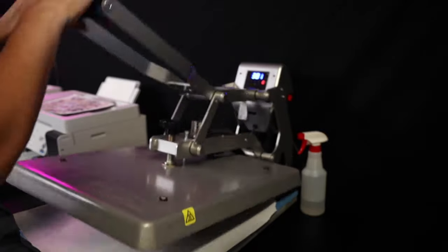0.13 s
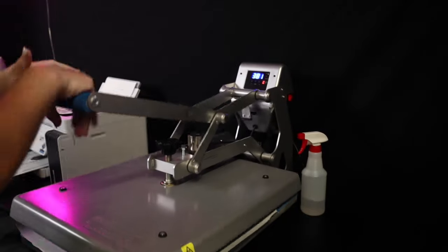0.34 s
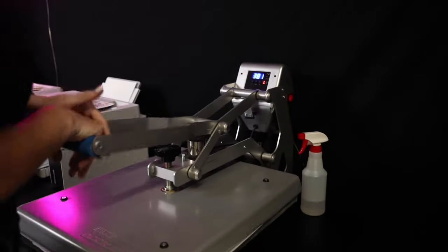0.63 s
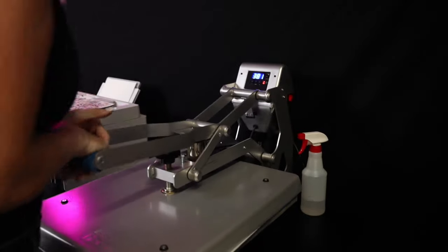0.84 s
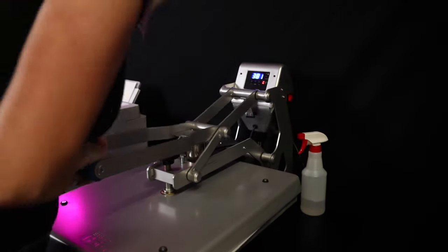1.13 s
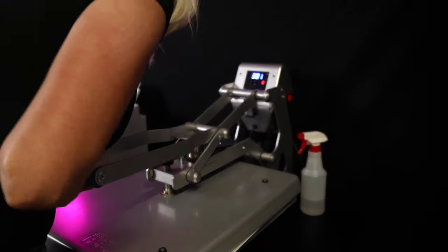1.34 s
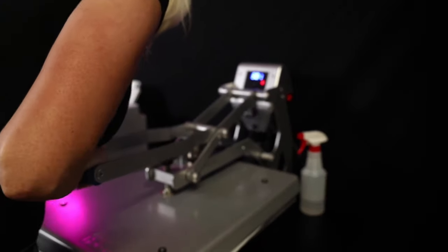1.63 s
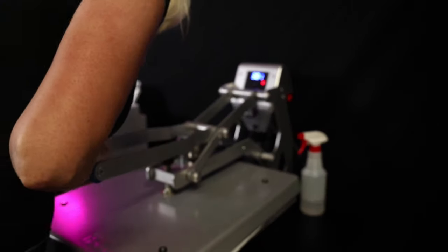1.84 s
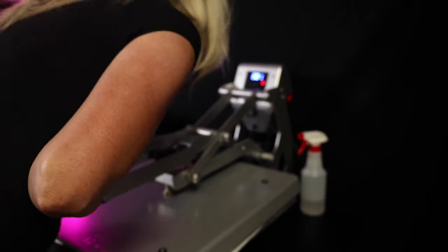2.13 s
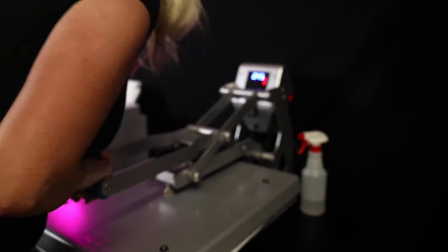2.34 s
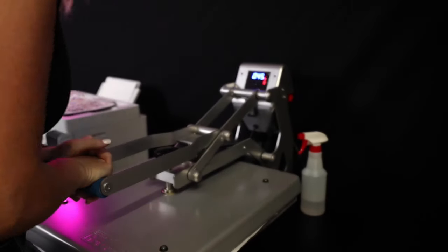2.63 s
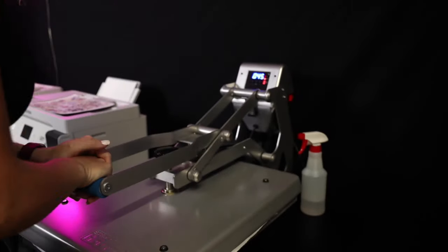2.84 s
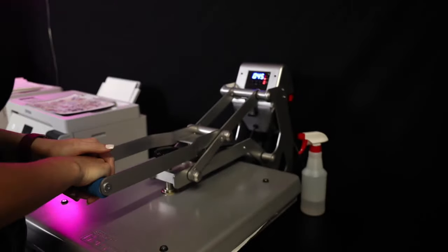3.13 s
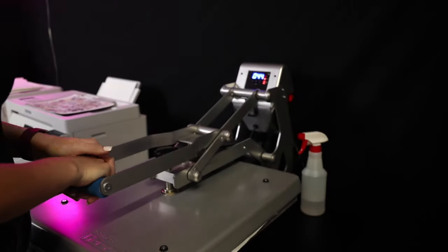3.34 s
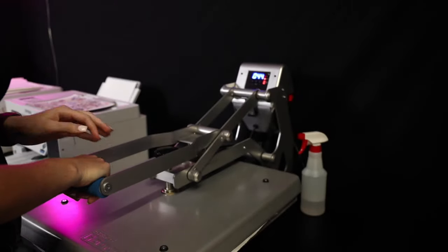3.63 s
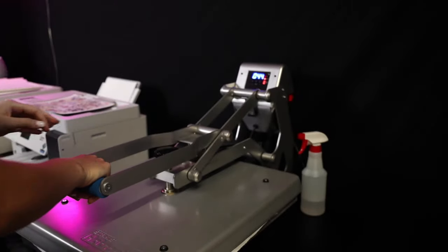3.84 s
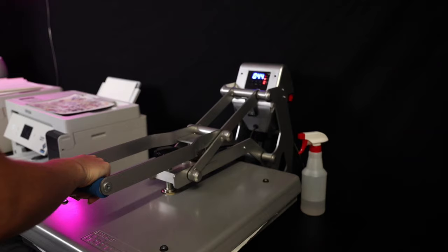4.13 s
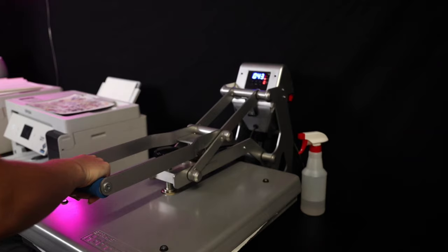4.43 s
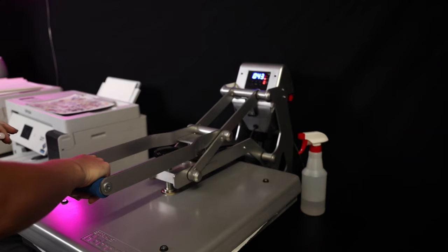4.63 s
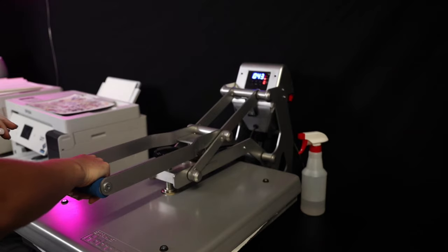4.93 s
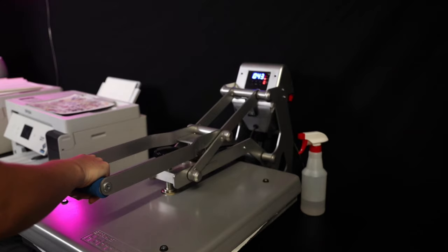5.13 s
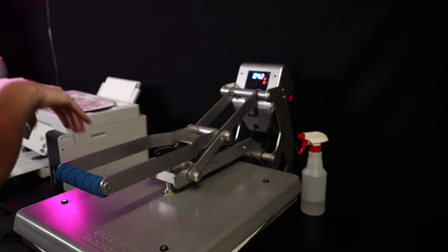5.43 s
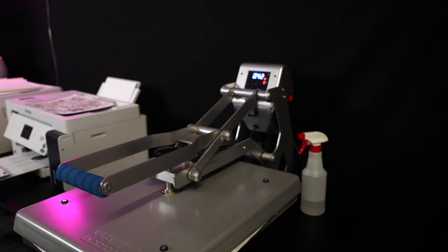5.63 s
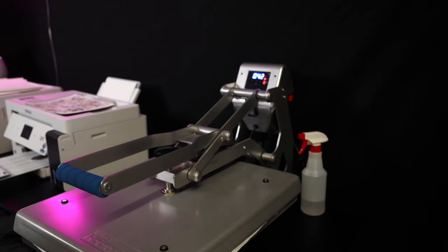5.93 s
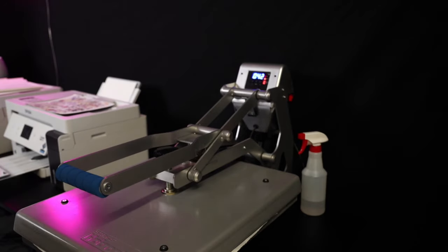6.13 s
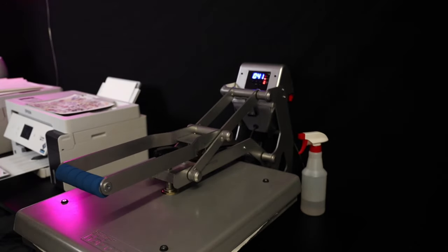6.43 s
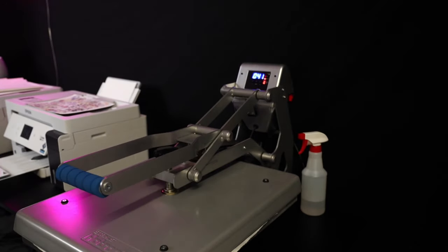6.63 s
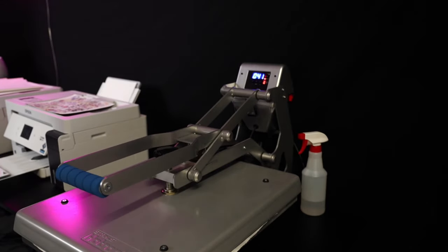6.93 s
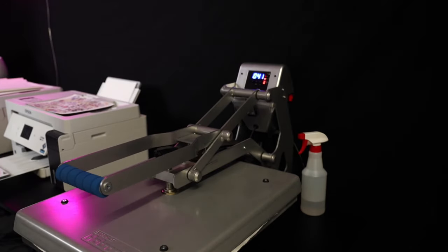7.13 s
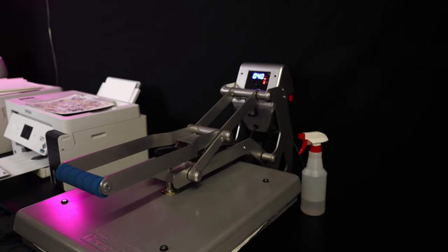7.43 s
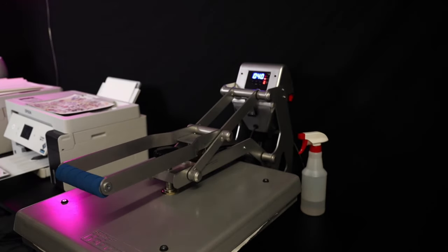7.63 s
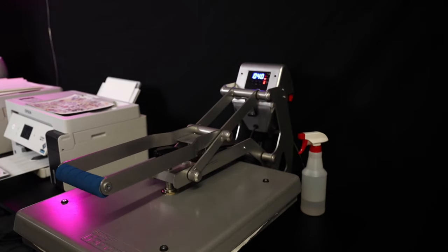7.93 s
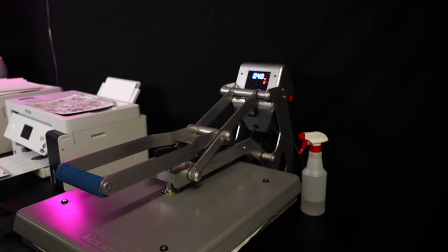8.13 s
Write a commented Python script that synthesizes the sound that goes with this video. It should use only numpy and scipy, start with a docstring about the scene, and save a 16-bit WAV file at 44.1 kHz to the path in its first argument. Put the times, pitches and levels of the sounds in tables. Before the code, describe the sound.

A heavy heat press is pulled shut near the microphone: a short creak, dry ringing metal squeals with a groaning spring, a soft padded thud. Sparse clicks and a faint cloth rustle lead to a sharp, rattling double metal clunk. Afterwards only low hum, soft hiss and barely audible ticks remain, ending with deep stand knocks, tiny squeaks and rustling cloth.

```python
"""Heard first: a hinge creaking close by in a small quiet room, over air noise and the hum of a nearby machine.
A steel handle pulls down the upper plate of a heat press: the linkage scrapes and a spring groans, the plate
lands on the pad, joints tick, and the toggle snaps over with a double clunk. Cloth rustles now and then; at the
end the swaying microphone stand is bumped and squeaks. Chains of tiny random slips drive the resonances of the
metal parts, noise is coloured into cloth, pad and air, and sines make the hum, groan, sway and table boom."""
import sys
import numpy as np
from scipy import signal
from scipy.fft import rfft, irfft, next_fast_len
from scipy.io import wavfile
from scipy.ndimage import uniform_filter1d

SR = 44100
rng = np.random.default_rng(int(sys.argv[2]) if len(sys.argv) > 2 else 0)


def persist_wave(psi):
    """Save psi, clipped to +-1, as 16-bit WAV."""
    counts = np.round(np.clip(psi, -1, 1) * 32767).astype(np.int16)
    wavfile.write(sys.argv[1], SR, np.atleast_2d(counts).T)


N = 366030

# Spectrum of the room rumble and microphone hiss: (frequency [Hz], relative density [dB per Hz])
AIR_COLOUR = [(5, -21), (18, -6), (30, -6), (45, -7), (90, -11), (150, -15), (200, -18.5), (290, -21),
              (420, -27.5), (590, -28), (780, -29), (1070, -35.5), (1220, -32), (1900, -41.5), (11900, -51)]
# Steady tones of the nearby machine: (frequency [Hz], level [dB rms])
HUM_TONES = [(120, -75.5), (220.7, -68), (258.4, -74.5), (780.6, -92), (1179, -100)]
# Its one wavering tone: (frequency [Hz], width of each resonance [Hz], level [dB rms])
WAVERING_TONE = (114, 14, -73.5)
# Jolts through the floor that swell the sway of the stand: (middle [s], level [dB], half length [s])
FLOOR_JOLTS = [(.25, -51, .06), (.76, -55.5, 0.057), (1.04, -45.5, 0.075), (2.35, -65, 0.14),
               (3.9, -58.5, .1), (4.14, -52, .04)]
# Knocks on the microphone stand: (time [s], level [dB])
STAND_KNOCKS = [(7.898, -18), (7.938, -11.5), (8.006, -13), (8.163, -19), (8.207, -28.5), (8.251, -29)]
# Modes of the stand: (frequency [Hz], relative level [dB], t60 [s])
STAND_MODES = [(14, -11, 0.46), (21.9, -10.5, 1), (54, -26.5, 0.38), (115.5, -34.5, 0.73)]
# First slips of the hinge: (time [s], relative level [dB], hold [s])
HINGE_SLIPS = [(0, -55, 0.0037), (0.007, -52, 0.0081), (0.016, -65, 0.018), (0.053, -51.5, 0.0091),
               (0.066, -70, 0.015)]
# Resonances of the hinge: (frequency [Hz], width [Hz], relative level [dB])
HINGE_MODES = [(2120, 120, -8), (2320, 35, -11), (2605, 70, -3.5), (3380, 46, -6), (3660, 100, -6.5),
               (4600, 41, -21), (6120, 100, -19)]
# Strokes of the sliding linkage: (start [s], length [s], level [dB], sag over the stroke [dB],
# low modes re level [dB], high modes re level [dB])
SLIDE_STROKES = [(0.381, 0.26, -48.5, 1, -5, -7), (0.664, 0.022, -51.5, 0, -2.5, -2),
                 (0.758, 0.011, -66, -6.5, -17, 13), (0.774, 0.1, -48, 6.5, -4, -5.5)]
# Resonances of the linkage: (frequency [Hz], width [Hz], relative level [dB])
LINKAGE_MODES = [(1576, 15, -10), (1860, 18, -5.5), (1913, 32, -5.5), (2103, 14, -4.5), (2316, 15, -11.5),
                 (2704, 35, -4), (2910, 16, -10.5), (3082, 36, -2.5), (3430, 110, -15), (3780, 59, 7),
                 (4100, 16, -42), (4270, 32, 0.5), (4670, 22, -6.5), (5220, 38, -13), (6100, 27, -12),
                 (6235, 110, -8.5), (6520, 41, -8.5), (6750, 26, -22), (7435, 28, -50)]
# Its faint high overtones: (frequency [Hz], width of each resonance [Hz], level re stroke [dB])
LINKAGE_OVERTONES = [(8600, 310, -38), (10400, 940, -42)]
# Spectrum of the broad scrape: (frequency [Hz], relative density [dB per Hz])
SCRAPE_COLOUR = [(530, -31), (900, 16), (1160, -44), (1390, -10), (1940, 1), (2180, -6.5), (3800, 5),
                 (4950, -6), (6330, -37.5), (11500, -89.5), (15000, -93), (22000, -120)]
# Pulls in which the counter-spring groans: (start [s], length [s], level [dB], sag over the pull [dB],
# jerk at the start re level [dB])
HANDLE_PULLS = [(.388, .33, -63.5, 13, -18), (0.785, 0.14, -71, 0.5, 16.5)]
# Partials of the groan: (multiple of the slip rate, relative level [dB])
GROAN_PARTIALS = [(1, -12.5), (2, -9.5), (3, 0), (4, -2), (5, 5), (6, 3), (7, -12.5), (8, 4), (9, 0),
                  (10, 6.5), (11, 2.5)]
# Contacts of the plate with the pad: (time [s], mean level [dB])
PLATE_CONTACTS = [(.886, -41), (.892, -37.5), (.899, -33.5), (.906, -41.5), (.928, -50), (.945, -68)]
# Modes of the plate: (frequency [Hz], relative level [dB], t60 [s])
PLATE_MODES = [(428, -20, 0.37), (558, -6.5, 0.058), (638, -7.5, 0.056), (840, -4, 0.032),
               (1420, -14, 0.03), (2160, -13.5, 0.028), (2960, -12, 0.026), (4140, -17, 0.035),
               (4930, -15, 0.028)]
# Booms of the table under the plate and the toggle: (time [s], level [dB])
TABLE_BOOMS = [(0.885, -54.5), (2.235, -62)]
# Spectra of the squeezed pad and of the cloth: (frequency [Hz], relative density [dB per Hz])
PAD_SPECTRUM = [(88, -27), (150, 5), (226, -25), (283, -50), (378, 3), (1440, -9.5), (3890, -13),
                (9000, -42), (11700, -70), (19800, -120)]
CLOTH_SPECTRUM = [(180, -28), (300, -5), (561, -3), (773, -7.5), (1180, -6), (11500, -28.5), (15000, -58),
                  (22000, -120)]
# Cloth moving: (middle [s], level [dB], half length [s])
CLOTH_MOVES = [(1.3, -79.5, 0.19), (5.3, -85, 0.082), (5.9, -86.5, 0.23), (7.55, -75.5, .07),
               (7.89, -75, 0.087), (8.2, -73, 0.14)]
# Joints ticking: (time [s], level [dB], pitch [Hz], broad part re modes [dB], hold [s])
JOINT_TICKS = [(0.934, -61, 1150, -12, 0.0091), (0.97, -85, 2500, -11, 0.014), (0.976, -66, 2420, 0, 0.02),
               (0.998, -65, 1145, -17, 0.0099), (1.142, -72, 1166, -9, 0.0047),
               (1.174, -76.5, 1100, -31, 0.037), (1.202, -75, 1390, -5, 0.012),
               (1.28, -76, 4940, -4.5, 0.013), (1.344, -77.5, 3080, 9, 0.011),
               (1.379, -63.5, 2820, -4, 0.014), (1.556, -74.5, 1130, -1.5, 0.0076),
               (1.589, -68.5, 1850, -21, 0.022), (2.198, -78.5, 4200, 0, 0.01),
               (2.442, -59.5, 1140, -5, 0.011), (2.506, -64.5, 1570, -24.5, 0.011),
               (2.592, -79, 1300, -9, 0.021), (2.744, -76.5, 1253, -4, 0.012), (5.332, -90, 4500, 1, .014),
               (5.591, -96.5, 2300, 16.5, .023), (5.863, -87, 5500, -1, .026), (6.047, -89, 2650, -5, .016)]
# Resonances of the joints: (frequency [Hz], width of each resonance [Hz], relative level [dB])
JOINT_MODES = [(1140, 270, 3.5), (1850, 400, 2.5), (2600, 450, -5), (2880, 83, -3.5), (3850, 500, -3),
               (4300, 200, -1.5), (6600, 1200, 0.5)]
# The toggle striking the frame, then bouncing: (time [s], level [dB], lowest frequency passed [Hz],
# highest frequency passed [Hz], rattle hold [s])
TOGGLE_BLOWS = [(2.2309, -25.5, 455, 14030, .012), (2.247, -28.5, 90.1, 7000, .006),
                (2.2689, -24.5, 396, 3597, .012), (2.335, -50, 300, 1210, 0.005),
                (2.366, -59, 400, 2370, .008)]
# Modes of the frame: (frequency [Hz], relative level [dB], t60 [s])
FRAME_MODES = [(290, -2.5, 0.11), (407.2, -8.5, 0.19), (599, 1, .18), (680, -1, 0.097), (736.7, -6, .18),
               (1093, -13.5, .12), (1420, -11.5, .1), (1690, 0, 0.13), (1737, -1.5, .12), (2162, -6, .22),
               (2260, -5, 0.16), (2455, -2, 0.13), (2790, -14, 0.086), (3596, -1, .12), (3725, -1.5, 0.047),
               (3690, -3.5, 0.1), (4134, -13, 0.17), (4500, -11, 0.12), (5300, -6.5, .09),
               (5300, -10, 0.14), (6519, -12.5, .15), (8000, -20, .18), (10700, -16.5, .1)]
# Spectrum of the loose parts rattling: (frequency [Hz], relative density [dB per Hz])
RATTLE_COLOUR = [(60, -31.5), (190, -25.5), (270, -3.5), (594, -7), (1060, -12), (1400, -9), (4340, -14.5),
                 (5270, -10.5), (7280, -19.5), (10700, -18.5), (12000, -30.5), (15000, -45)]
# Faint squeaks while the stand is handled: (time [s], level [dB], pitch [Hz], hold [s])
STAND_SQUEAKS = [(7.867, -74, 362, 0.026), (7.886, -76, 2160, 0.045), (8.191, -69.5, 3240, 0.033)]

AIR_DB, HISS_STOP_HZ = -67.5, 12200
SWAY_HZ, SWAY_DB = 23.8, -61.5   # middle values; both wander
STROKE_ATTACK_S, STROKE_RELEASE_T60_S = 0.0043, 0.14
LOW_BUILD_S, HIGH_BUILD_S = 0.012, 0.041   # low and high modes join a stroke late
SQUEAL_FROM_HZ, SQUEAL_FALL_HZ_PER_S = 2020, 1100   # mode favoured by the contact, from each pull on
SQUEAL_STEADINESS = 0.49   # a squealing mode feeds itself and holds its level: 0 free, 1 fully even
SLIPS_PER_S, SLIP_FALL_PER_S2 = 396, 50   # rate at the start of a pull, and its fall
JERK_T60_S, GROAN_TREMBLE_DB = 0.031, 3.5
TABLE_HZ, TABLE_T60_S = 81.6, 0.9
PAD_S, PAD_DB, PAD_ATTACK_S, PAD_T60_S = 0.886, -46, 0.015, 0.11   # the plate squeezes pad and paper
PAD_CREEP_S, PAD_CREEP_DB = 0.12, -16   # fainter crackle that lasts longer, re PAD_DB
JOINT_REACH_DB_PER_OCTAVE = 14.5   # modes away from the pitch of a tick are weaker
FIRST_SLIP = 2.5   # size of the contact that opens a tick or a blow, re rms of the chatter
CRACK_DB = -6   # bare first contact of a blow, re its level
SETTLING_TOP_HZ = 5000   # the parts that settle last sound duller
SQUEAK_WIDTH = 0.09   # width of each resonance, as a share of the pitch
ROOM_T60_S, ROOM_DB = 0.14, -12
CUTOFF_HZ = 15100


def from_db(db):
    """Amplitude factor of a level in dB."""
    return 10 ** (np.asarray(db) / 20)


def rms_one(x):
    """Scales x to rms 1."""
    return x / np.sqrt(np.mean(x ** 2) + 1e-30)


def lowpass(x, order, top_hz):
    """Butterworth filter that keeps what lies below top_hz."""
    return signal.sosfilt(signal.butter(order, top_hz, fs=SR, output="sos"), x)


def bandpass(x, order, low_hz, high_hz):
    """Butterworth filter that keeps what lies between two frequencies."""
    return signal.sosfilt(signal.butter(order, [low_hz, high_hz], "band", fs=SR, output="sos"), x)


def coloured(x, spectrum):
    """Gives x the spectrum of a table; rms 1."""
    hz, level_db = np.transpose(spectrum)
    size = next_fast_len(len(x))
    bins = np.maximum(np.fft.rfftfreq(size, 1 / SR), 1)
    gain = from_db(np.interp(np.log(bins), np.log(hz), level_db))
    return rms_one(irfft(rfft(x, size) * gain, size)[:len(x)])


def resonate(x, hz, width_hz):
    """Two-pole resonance with gain 1 on top."""
    r = np.exp(-np.pi * width_hz / SR)
    return signal.lfilter(np.array([1, 0, -1]) * (1 - r * r) / 2,
                          [1, -2 * r * np.cos(2 * np.pi * hz / SR), r * r], x)


def resonate_twice(x, hz, width_hz):
    """Two equal resonances in a row: steeper skirts."""
    return resonate(resonate(x, hz, width_hz), hz, width_hz)


def ring(clicks, hz, t60):
    """A unit click sets a decaying sine of height about 1 ringing."""
    r, w = from_db(-60 / (t60 * SR)), 2 * np.pi * hz / SR
    return signal.lfilter([0, np.sin(w)], [1, -2 * r * np.cos(w), r * r], clicks + 1e-18)


def grains(per_s, spread_db, count):
    """Random tiny impacts of uneven size; rms 1."""
    sizes = from_db(spread_db * np.minimum(rng.exponential(1, count), 5))
    signed = sizes * rng.choice([-1, 1], count)
    return rms_one(signed * (rng.random(count) < per_s / SR))


def opened(chatter):
    """Chatter that starts with a definite contact."""
    return np.concatenate([[FIRST_SLIP], chatter[1:]])


def burst(hold_s, t60, count):
    """Envelope that starts at once, holds, then dies away."""
    return from_db(-60 / t60 * np.maximum(np.arange(count) / SR - hold_s, 0))


def stroke(start_s, length_s, sag_db, attack_s, t60, count):
    """Envelope that rises, sags evenly in dB over its length, then dies away."""
    t = np.arange(count) / SR - start_s
    rise = np.clip(t / attack_s, 0, 1) ** 2
    sag = -sag_db * np.clip(t / length_s, 0, 1)
    return rise * from_db(sag - 60 / t60 * np.maximum(t - length_s, 0))


def swells(rows):
    """Sum of bell-shaped envelopes."""
    t = np.arange(N) / SR
    return sum(from_db(db) * np.exp(-((t - s) / half_s) ** 2) for s, db, half_s in rows)


def drift(rate, count):
    """Slow chance with spread about 1: noise through two equal one-pole lowpasses at rate [Hz]."""
    r = np.exp(-2 * np.pi * rate / SR)
    noise = rng.standard_normal(count + SR // 4)
    return rms_one(signal.lfilter([1], [1, -2 * r, r * r], noise)[SR // 4:])


def evened(x, share):
    """Takes out a share of the level changes slower than 8 ms."""
    local_power = uniform_filter1d(x ** 2, size=350) + 1e-12
    return x * (np.mean(x ** 2) / local_power) ** (share / 2)


def since_pull(count):
    """Seconds since the start of the current pull; negative before the first."""
    t, starts = np.arange(count) / SR, np.array(HANDLE_PULLS)[:, 0]
    return t - starts[np.maximum(np.searchsorted(starts, t) - 1, 0)]


def air():
    """Room rumble and microphone hiss: coloured noise with its top cut."""
    noise = coloured(rng.standard_normal(N), AIR_COLOUR)
    top_cut = signal.cheby2(24, 40, HISS_STOP_HZ, fs=SR, output="sos")
    return from_db(AIR_DB) * signal.sosfilt(top_cut, noise)


def hum():
    """Steady motor tones as sines, and one wavering tone as narrow noise."""
    t = np.arange(N) / SR
    steady = sum(np.sqrt(2) * from_db(db) * np.sin(2 * np.pi * (hz * t + rng.random()))
                 for hz, db in HUM_TONES)
    hz, width_hz, db = WAVERING_TONE
    wavering = rms_one(resonate_twice(rng.standard_normal(N), hz, width_hz))
    return steady + from_db(db) * wavering


def stand():
    """The microphone stand sways near one low pitch and rings in its modes when knocked."""
    sway_hz = SWAY_HZ * (1 + 0.12 * drift(2.7, count=N))
    level = from_db(SWAY_DB + 3.5 * drift(3.7, count=N)) + swells(FLOOR_JOLTS)
    sway = np.sqrt(2) * level * np.sin(2 * np.pi * np.cumsum(sway_hz) / SR)
    knocks = np.zeros(N)
    for s, db in STAND_KNOCKS:
        knocks[round(s * SR)] = from_db(db)
    knocks = lowpass(knocks, 2, 90)   # a soft hand
    return sway + sum(from_db(db) * ring(knocks, hz, t60) for hz, db, t60 in STAND_MODES)


def creaks():
    """First slips of the hinge: short chatters in its resonances."""
    out, count = np.zeros(N), SR // 4
    for s, db, hold_s in HINGE_SLIPS:
        chatter = grains(per_s=1400, spread_db=2.0, count=count) * burst(hold_s, 0.062, count=count)
        rung = sum((-1) ** k * from_db(mode_db) * resonate(chatter, hz, width_hz)
                   for k, (hz, width_hz, mode_db) in enumerate(HINGE_MODES))
        at = round(s * SR)
        out[at:at + count] += from_db(db + 19) * rung
    return bandpass(out, 2, 1500, 5000)


def slide():
    """Dry steel on steel: dense slips drive the linkage resonances and a broader scrape."""
    count = SR
    slips, t = grains(per_s=7300, spread_db=5.5, count=count), np.arange(count) / SR
    # the contact travels along the arm
    favoured_hz = SQUEAL_FROM_HZ - SQUEAL_FALL_HZ_PER_S * since_pull(count)
    rung = 0
    for k, (hz, width_hz, db) in enumerate(LINKAGE_MODES):
        squeal_db = 8 * np.exp(-(np.log(hz / favoured_hz) / 0.018) ** 2)
        mode_level = from_db(db + squeal_db + 3.9 * drift(12, count=count))
        mode = evened(resonate(slips, hz, width_hz), SQUEAL_STEADINESS)
        rung = rung + (-1) ** k * mode_level * mode
    sound = rms_one(rung) + from_db(-8.0) * coloured(slips, SCRAPE_COLOUR)
    low = rms_one(bandpass(sound, 4, 1400, 2450))
    middle = rms_one(bandpass(sound, 4, 2450, 5750))
    high = rms_one(bandpass(sound, 4, 5550, 7200))
    top = sum(from_db(db) * rms_one(resonate_twice(slips, hz, width_hz))
              for hz, width_hz, db in LINKAGE_OVERTONES)
    out = np.zeros(N)
    for s, length_s, db, sag_db, low_db, high_db in SLIDE_STROKES:
        since_start = np.maximum(t - s, 0)
        low_gain = from_db(low_db) * (1 - np.exp(-since_start / LOW_BUILD_S))
        high_gain = from_db(high_db) * (1 - np.exp(-since_start / HIGH_BUILD_S))
        level = from_db(db) * stroke(s, length_s, sag_db, STROKE_ATTACK_S, STROKE_RELEASE_T60_S, count=count)
        out[:count] += level * (middle + low_gain * low + high_gain * high + top)
    return out


def groan():
    """Stick-slip of the counter-spring: sines at multiples of a trembling slip rate, the jerk in the low ones."""
    count, out = SR, 0
    level = sum(from_db(db) * stroke(s, length_s, sag_db, 0.012, 0.05, count=count)
                for s, length_s, db, sag_db, jerk_db in HANDLE_PULLS)
    jerk = sum(from_db(db + jerk_db) * stroke(s, 0.0076, 0, 0.0047, JERK_T60_S, count=count)
               for s, length_s, db, sag_db, jerk_db in HANDLE_PULLS)
    falling_rate = SLIPS_PER_S - SLIP_FALL_PER_S2 * since_pull(count)
    rate = falling_rate * (1 + 0.00573 * drift(18.5, count=count))
    for multiple, db in GROAN_PARTIALS:
        partial_hz = multiple * rate * (1 + 0.0036 * drift(38, count=count))
        turns = rng.random() + np.cumsum(partial_hz) / SR
        tremble = from_db(db + GROAN_TREMBLE_DB * drift(28, count=count))
        out = out + (level + jerk * (multiple <= 3)) * tremble * np.sin(2 * np.pi * turns)
    return np.pad(out, (0, N - count))


def table():
    """One low mode of the table, pushed softly."""
    out = 0
    for s, db in TABLE_BOOMS:
        t = np.maximum(np.arange(N) / SR - s, 0)
        envelope = from_db(db - 60 / TABLE_T60_S * t) * (1 - np.exp(-t / 0.035))
        out = out + envelope * np.sin(2 * np.pi * TABLE_HZ * t)
    return out


def landing():
    """The plate settles on the padded table: a few dull contacts ring its modes, each unevenly."""
    at, out = [round(s * SR) for s, db in PLATE_CONTACTS], np.zeros(N)
    contact_db = np.array(PLATE_CONTACTS)[:, 1]
    for hz, mode_db, t60 in PLATE_MODES:
        clicks = np.zeros(SR + SR // 2)
        sizes = from_db(contact_db + mode_db + rng.normal(0, 2.8, len(at)))
        clicks[at] = sizes * rng.choice([-1, 1], len(at))
        out[:len(clicks)] += ring(clicks, hz, t60)
    return bandpass(out, 2, 330, 6000)


def rustle():
    """Fine crackle of the pad as the plate squeezes it, and of moving cloth."""
    crackle = grains(per_s=7000, spread_db=-1.0, count=N)
    crush = stroke(PAD_S, PAD_ATTACK_S, 0, PAD_ATTACK_S, PAD_T60_S, count=N)
    creep = from_db(PAD_CREEP_DB) * stroke(PAD_S, PAD_CREEP_S, 0, PAD_ATTACK_S, 0.16, count=N)
    # the same crackle backwards serves the pad
    pad = from_db(PAD_DB) * (crush + creep) * coloured(crackle[::-1], PAD_SPECTRUM)
    return swells(CLOTH_MOVES) * coloured(crackle, CLOTH_SPECTRUM) + pad


def ticks():
    """A joint slips: a short chatter, partly broad, partly in the joint modes near its pitch."""
    out, count = np.zeros(N + SR), SR // 8
    first_slip = 0.27 * burst(0, 0.0081, count=count)   # the first slip is the hardest
    for s, level_db, pitch_hz, broad_db, hold_s in JOINT_TICKS:
        chatter = opened(grains(per_s=4900, spread_db=-0.5, count=count))
        modes = 0
        for hz, width_hz, db in JOINT_MODES:
            reach_db = -JOINT_REACH_DB_PER_OCTAVE * abs(np.log2(hz / pitch_hz))
            modes = modes + from_db(db + reach_db) * rms_one(resonate_twice(chatter, hz, width_hz))
        bare = from_db(-4.5) * chatter * burst(0.0045, 0.022, count=count)
        broad = rms_one(bandpass(chatter, 3, 800, 4800)) + bare
        envelope = burst(hold_s, 0.03, count=count) + first_slip
        at = round(s * SR)
        out[at:at + count] += from_db(level_db) * envelope * (rms_one(modes) + from_db(broad_db) * broad)
    return lowpass(out[:N], 8, 11500)


def blows():
    """Each blow rings the frame modes and shakes the loose parts; a soft contact dulls both."""
    out, count = np.zeros(N), SR // 2
    for s, level_db, low_hz, high_hz, rattle_s in TOGGLE_BLOWS:
        push = opened(grains(per_s=6600, spread_db=4.0, count=count)) * burst(0.0014, 0.02, count=count)
        modes = sum(from_db(db - 38.0) * ring(push, hz, t60) for hz, db, t60 in FRAME_MODES)
        loose = coloured(opened(grains(per_s=8200, spread_db=2.0, count=count)), RATTLE_COLOUR)
        settling = lowpass(loose, 1, SETTLING_TOP_HZ) * burst(rattle_s, 0.36, count=count)
        rattle = loose * burst(rattle_s, 0.08, count=count) + from_db(-11) * settling
        crack = coloured(rng.standard_normal(count), RATTLE_COLOUR) * burst(0.001, 0.0097, count=count)
        blow = modes + from_db(-9.5) * rattle + from_db(CRACK_DB) * crack
        at = round(s * SR)
        out[at:at + count] += from_db(level_db) * bandpass(blow, 2, low_hz, high_hz)
    return out


def squeaks():
    """Short chatters, each in one narrow resonance."""
    out, count = np.zeros(N + SR), SR // 8
    for s, db, hz, hold_s in STAND_SQUEAKS:
        chatter = grains(per_s=1900, spread_db=2.0, count=count)
        squeak = rms_one(resonate_twice(chatter, hz, SQUEAK_WIDTH * hz))
        at = round(s * SR)
        out[at:at + count] += from_db(db) * burst(hold_s, 0.026, count=count) * squeak
    return out[:N]


def room(x):
    """Dense echoes of a small furnished room: convolution with dying noise."""
    tail = rng.standard_normal(SR // 2) * burst(0.015, ROOM_T60_S, count=SR // 2)
    return signal.fftconvolve(x, tail / np.sqrt(np.sum(tail ** 2)))[:N]


def scene():
    """All sources at one microphone; the press and the squeaks also excite the room."""
    press = creaks() + slide() + groan() + landing() + blows() + ticks() + squeaks()
    surroundings = air() + hum() + stand() + table() + rustle()
    return (press + from_db(ROOM_DB) * room(press) + surroundings)[None]


def record(dry):
    """The top is cut steeply."""
    return signal.sosfilt(signal.cheby2(24, 50, CUTOFF_HZ, fs=SR, output="sos"), dry)


dry = scene()
out = record(dry)
persist_wave(out)
```